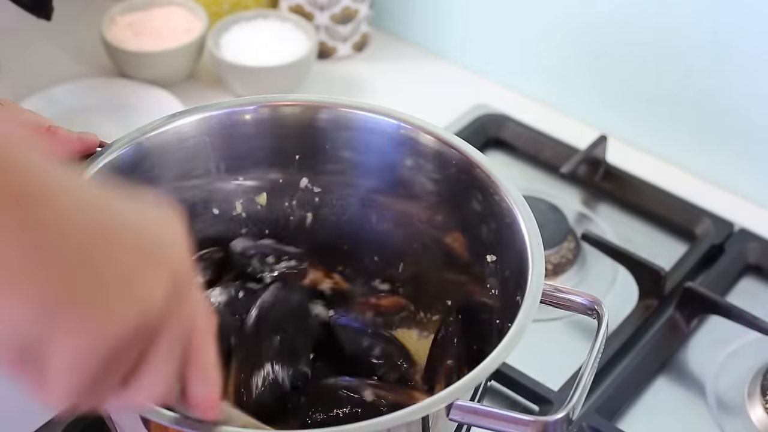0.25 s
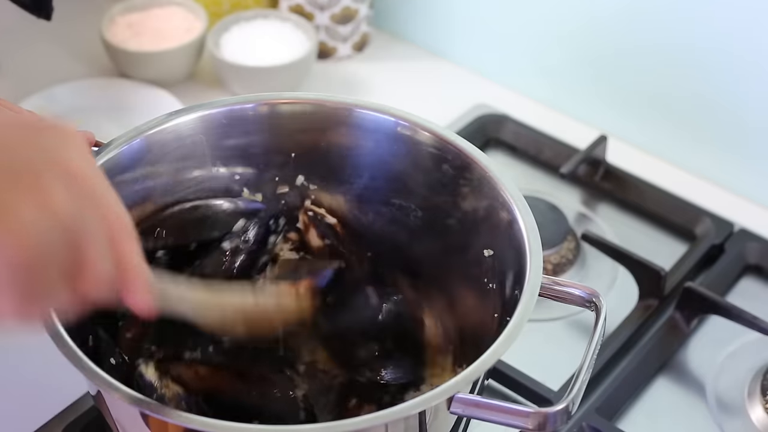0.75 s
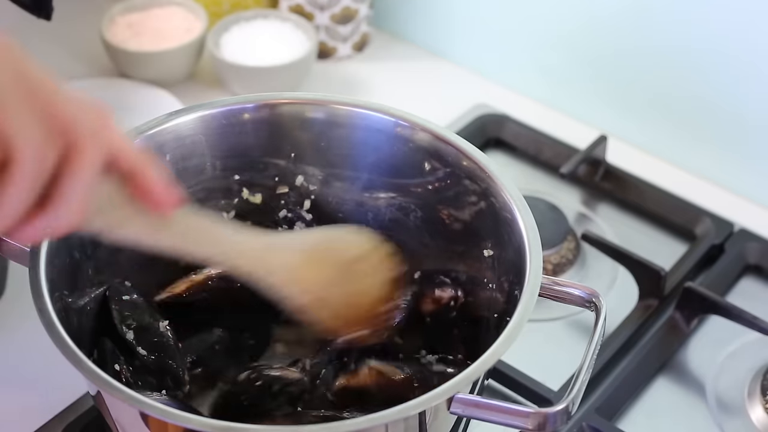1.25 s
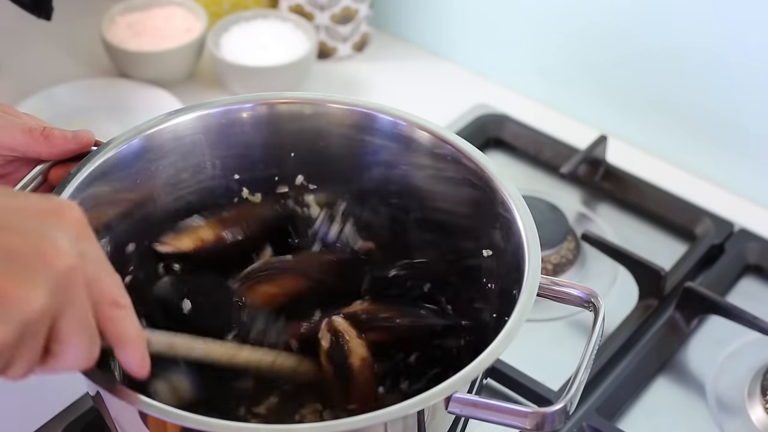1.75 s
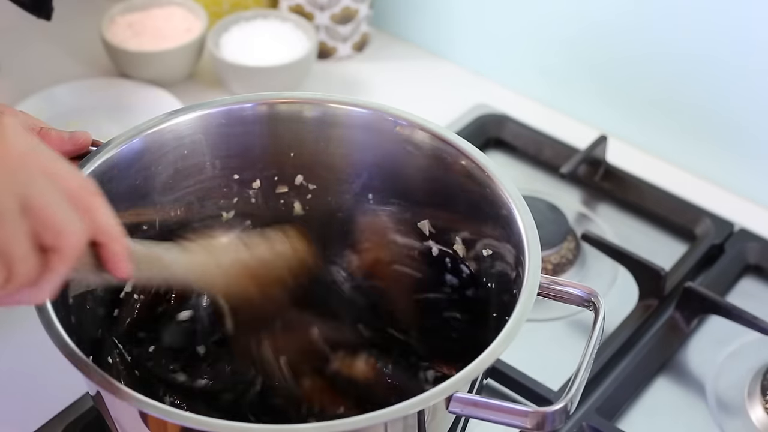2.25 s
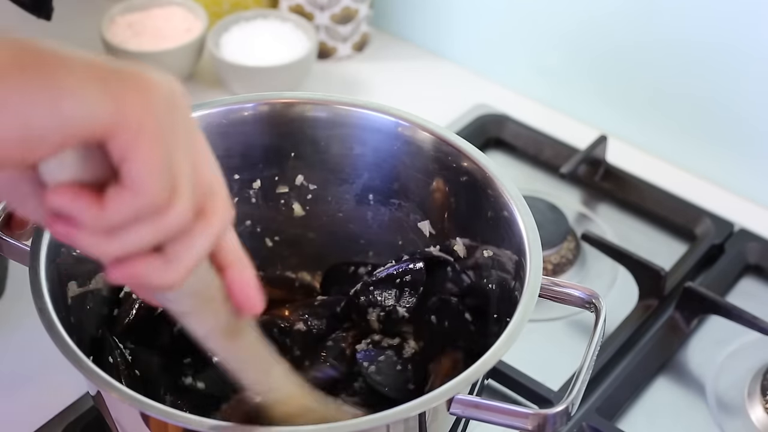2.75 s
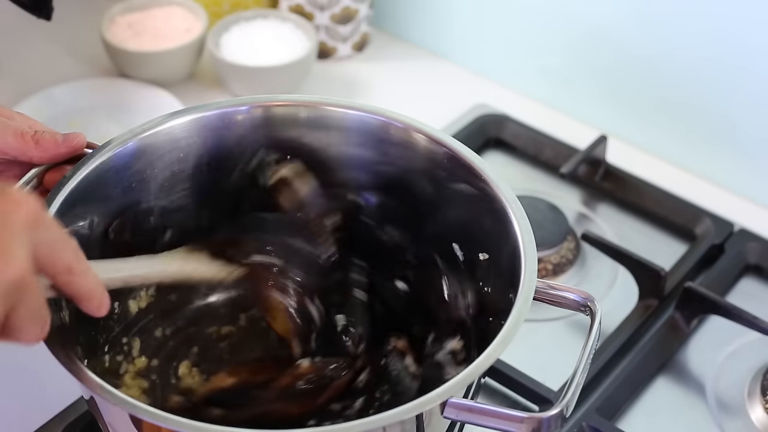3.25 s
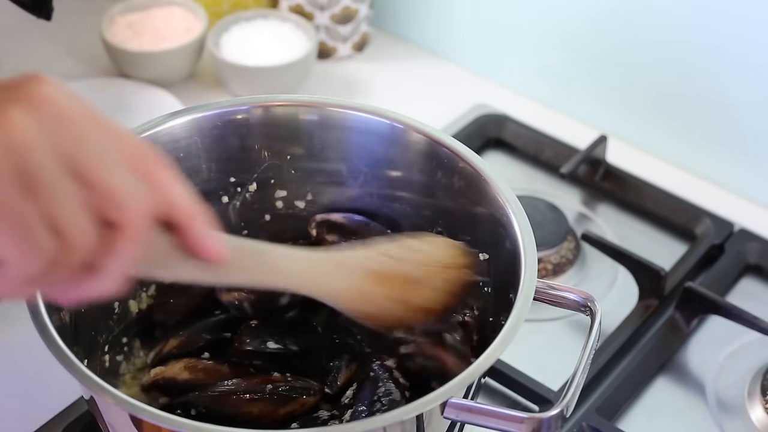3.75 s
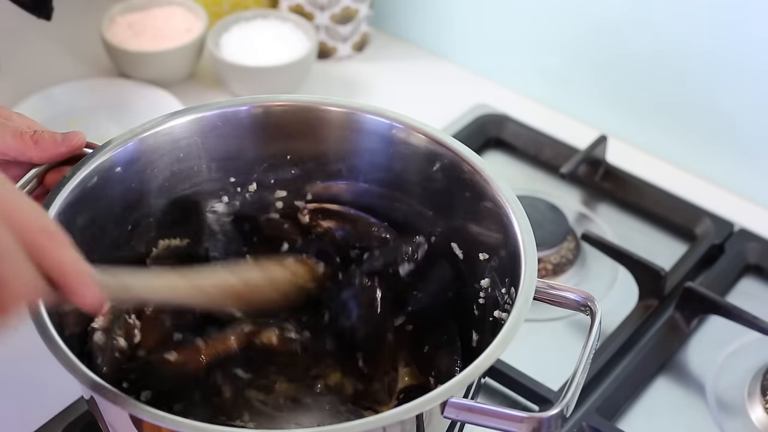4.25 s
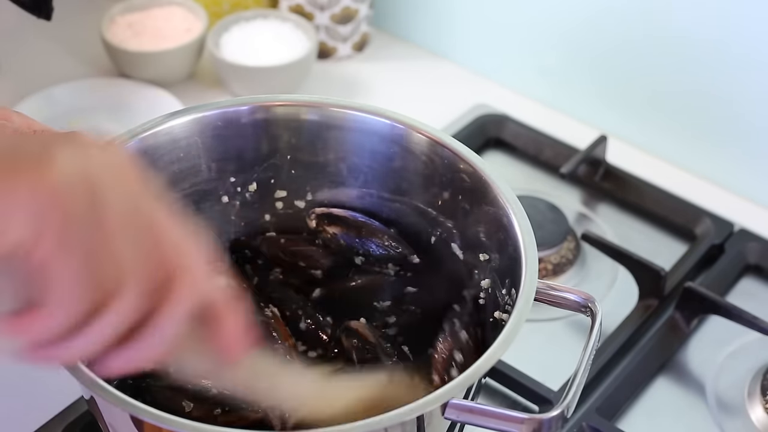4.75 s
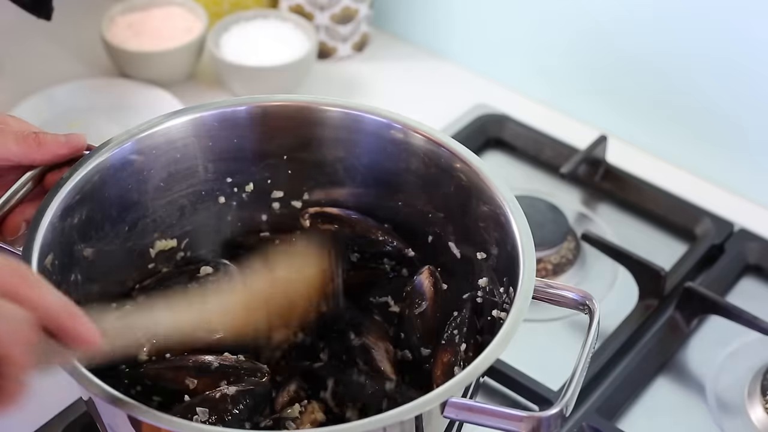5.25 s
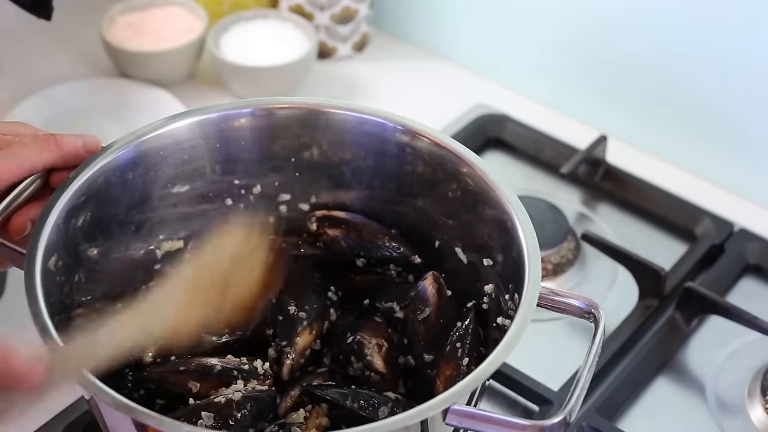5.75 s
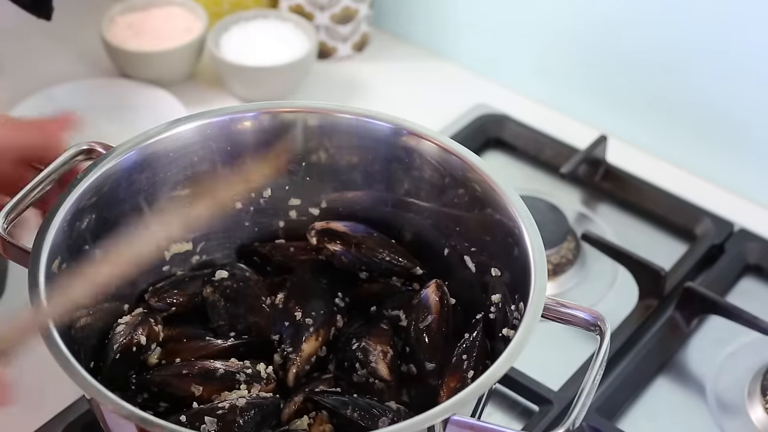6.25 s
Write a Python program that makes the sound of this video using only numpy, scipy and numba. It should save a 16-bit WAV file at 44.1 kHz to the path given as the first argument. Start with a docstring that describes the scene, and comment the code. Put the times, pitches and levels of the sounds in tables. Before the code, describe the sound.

From the start, a wooden spoon stirs mussels in a steel pot, close to the microphone in a small kitchen with short, hard echoes. The hollow shells clack, slide and tumble in irregular surges, with fine gritty crackling between them and the low, uneven scrape of the spoon on the bottom. Hits on the wall give short, damped metallic rings. The sharpest clacks come at about 0.7, 1.5 and 2.4 seconds, and the clatter stays busy until it thins out around 5 seconds. At about 5.4 seconds the wet spoon gives a brief, rough, rising squeak. The shells settle and the spoon knocks on the rim four times, at roughly 5.5, 5.75, 5.95 and 6.15 seconds, each a woody knock with a bright steel shimmer. A fizzing ring fades into faint room tone by about 6.5 seconds.

```python
"""Mussel shells clack and tumble as a wooden spoon stirs them in a steel pot, close to one microphone
in a small hard kitchen. The hollow shells slide and strike each other, grit crackles between them,
and the spoon sticks and slips over the bottom. Blows ring the steel wall, damped by the shells
leaning on it. The wet spoon squeaks out of the heap and is knocked four times on the rim,
which shimmers and leaves a fizzing tail."""
import sys
import numpy as np
from scipy import signal
from scipy.fft import rfft, irfft
from scipy.io import wavfile
from numba import njit

SR = 44100
rng = np.random.default_rng(int(sys.argv[2]) if len(sys.argv) > 2 else 0)


def file_out(sig):
    """Save sig as 16-bit WAV at sys.argv[1]."""
    # one column per channel
    cols = np.atleast_2d(sig).T
    # limit, then scale
    lim = np.clip(cols, -1, 1)
    pcm = np.round(lim * 32767).astype(np.int16)
    wavfile.write(sys.argv[1], SR, pcm)


N = 287091

# shells striking shells or steel: (time [s], shell ring [dB], shell pitch [Hz], favoured pot pitch [Hz],
# hollow knock [dB], treble [dB], pot ring [dB], rattle t60 [s])
CLACKS = [(0.049, -17, 1620, 1605, -46, -21.5, -24, 0.037), (0.095, 1, 2780, 1080, -14, -19.5, -19, 0.042),
          (0.13, -7, 1660, 820, -20, -34, -18, 0.059), (0.186, 2.5, 2570, 602, -9.5, -24, -23, 0.1),
          (0.225, 7, 3170, 3210, -35, -17, -21, 0.055), (0.302, -4, 2550, 2700, -26, -12.5, -29, 0.073),
          (0.344, 7, 2060, 1940, -19, -28.5, -26, 0.033), (0.41, -12, 1830, 1000, -13.5, -23, -45, 0.042),
          (0.454, -20, 1860, 1080, -30, -51, -44, 0.045), (0.474, -2, 1760, 1160, -31, -33, -34, 0.033),
          (0.512, -2, 4000, 1010, -12, -20, -16, 0.16), (0.596, -14, 1680, 1020, -10, -30, -29, 0.069),
          (0.623, -1, 1574, 980, -7, -44, -29, 0.12), (0.639, 4, 3290, 842, -13, -10, -13.5, 0.027),
          (0.728, 14.5, 2394, 850, -18, -14, -28, 0.028), (0.824, 3.5, 2410, 842, -49, -23, -16, 0.047),
          (0.927, 5, 1725, 835, -33, -29, -20.5, 0.032), (0.96, 4.5, 1950, 860, -15, -16.5, -35, 0.037),
          (1.018, 4.5, 3860, 836, -18, -16, -43, 0.088), (1.095, 5, 2000, 1040, -15, -30, -45, 0.05),
          (1.116, 6, 1850, 1860, -12, -23.5, -37, 0.062), (1.191, -20, 1640, 1046, -14, -37, -51, 0.081),
          (1.207, -22, 1650, 827, -10, -27, -21, 0.036), (1.239, -12, 1710, 1112, -10, -35, -32, 0.067),
          (1.377, -27, 1605, 1090, -22, -51, -35.5, 0.05), (1.446, -6, 1660, 822, -12, -57, -23.5, 0.05),
          (1.494, 15.5, 1770, 1260, -20, -25, -24, 0.055), (1.579, 5, 2930, 3060, -23, -15, -25, 0.053),
          (1.604, -4, 2570, 1130, -25, -20, -30, 0.037), (1.683, -12, 4040, 1110, -25, -26, -32, 0.045),
          (1.697, -11, 1630, 1000, -15, -21, -39, 0.034), (1.724, 7, 4100, 880, -6.5, -12, -36, 0.029),
          (1.811, -4, 1600, 1075, -20, -26, -18.5, 0.065), (1.877, -20, 1820, 1100, -28, -45, -43, 0.046),
          (1.924, -17, 1930, 1090, -27, -34, -27, 0.15), (1.957, -7, 1740, 1027, -9, -41, -39, 0.17),
          (2, -16, 1700, 1080, -15, -53, -43, 0.052), (2.031, -9, 1840, 990, -14.5, -20.5, -29, 0.092),
          (2.092, -1, 3886, 3820, -9.5, -17, -35, 0.057), (2.15, 7, 1620, 1070, -6, -21.5, -41, 0.038),
          (2.235, -6.5, 3800, 1460, -26, -27, -35, 0.083), (2.298, -20, 1840, 1000, -20, -48, -32, 0.055),
          (2.336, -14, 1930, 1900, -23, -26, -35, 0.064), (2.356, -17, 1760, 1080, -10, -22.5, -16, 0.11),
          (2.429, -6, 1700, 1000, -16, -22, -40, 0.04), (2.433, 14.5, 3130, 3240, -30, -7, -21, 0.06),
          (2.607, -12, 1800, 1150, -16, -27, -31, 0.055), (2.631, -6, 1550, 1060, -42, -22.5, -42, 0.054),
          (2.68, -12, 4250, 4370, -19, -24, -16, 0.039), (2.773, -23, 2750, 622, -19.5, -32, -19, 0.089),
          (2.854, -6, 1640, 1132, -13.5, -43, -39, 0.065), (2.903, -13, 1920, 1095, -13, -30, -35, 0.064),
          (2.951, -24, 3090, 634, -19, -51, -36, 0.07), (2.979, -21, 2420, 1045, -17.5, -41, -40, 0.13),
          (3.009, 7.5, 2690, 860, -14, -14.5, -28, 0.084), (3.096, 8.5, 4460, 1090, -19, -7.5, -32, 0.028),
          (3.234, -10, 4660, 3080, -22, -25.5, -31, 0.12), (3.252, -13, 2060, 1108, -11.5, -48, -35, 0.11),
          (3.329, -7, 2180, 1010, -29, -38, -25.5, 0.05), (3.363, -10, 3080, 3080, -29, -29.5, -35, 0.099),
          (3.418, -23, 1590, 1110, -31, -41, -34, 0.024), (3.454, -22, 3090, 3050, -26, -9.5, -24.5, 0.038),
          (3.489, 2, 1740, 1654, -43, -17, -13, 0.084), (3.6, -9, 1715, 1660, -24, -34, -41, 0.05),
          (3.635, 3, 3940, 3630, -18, -14.5, -29, 0.082), (3.751, -8, 1810, 1800, -33, -41, -21, 0.13),
          (3.813, -3, 1750, 1790, -36, -23.5, -32, 0.065), (3.872, -2, 4100, 4000, -13.5, -12, -13.5, 0.08),
          (3.99, -14, 1600, 1060, -44, -38, -22, 0.036), (4.023, -7, 1755, 1820, -44, -39, -18, 0.1),
          (4.053, -8, 1610, 1080, -28, -44, -28, 0.046), (4.087, 2, 2110, 2130, -18, -24, -25, 0.058),
          (4.168, -13, 1820, 1107, -16.5, -38, -32, 0.18), (4.211, 4, 1790, 1115, -23, -25, -23, 0.027),
          (4.235, -1, 2580, 2640, -37, -17, -33, 0.055), (4.244, -3, 1720, 1083, -14.5, -28, -12.5, 0.2),
          (4.309, 2, 1620, 1710, -23, -18, -19, 0.043), (4.328, 2, 1650, 1684, -36, -11, -15.5, 0.035),
          (4.417, -5, 1630, 1650, -26, -33, -42, 0.063), (4.432, -7, 1740, 1770, -24, -20, -18, 0.067),
          (4.482, -21, 1670, 995, -29, -25, -43, 0.061), (4.517, 5, 4670, 1010, -14.5, -11.5, -25, 0.042),
          (4.559, -6, 1650, 1060, -18, -19.5, -27, 0.026), (4.625, -1.5, 1720, 1716, -12, -11, -9, 0.055),
          (4.79, -5, 1850, 1150, -15, -52, -37, 0.042), (4.85, -17, 1710, 1700, -36, -40, -29, 0.032),
          (4.887, -4, 1760, 1760, -16.5, -28, -29, 0.13), (4.944, -13, 3280, 830, -38, -30, -32, 0.037),
          (4.976, -20, 1750, 1100, -17, -34, -41, 0.059), (5.038, -9, 1530, 1064, -17, -46, -38, 0.087),
          (5.11, -16, 1780, 1810, -40, -33, -40, 0.082), (5.132, -12, 2200, 1100, -22, -24, -45, 0.03),
          (5.137, 7, 2590, 1150, -6, -20.5, -36, 0.035), (5.216, -5, 1500, 1210, -10, -53, -27, 0.033),
          (5.238, -5, 3160, 1036, -11, -20, -40, 0.08), (5.315, -22, 3430, 590, -32, -32, -35, 0.062),
          (5.398, -27, 1680, 732, -20, -48, -39, 0.048), (5.41, -25, 1680, 915, -23, -49, -36, 0.078),
          (5.535, -15, 1765, 567, -15.5, -32, -26, 0.061), (5.541, 4, 1720, 1700, -33, -8, -34, 0.054),
          (5.75, 7, 1550, 1170, -9.5, -21, -26, 0.038), (5.755, 5, 5300, 1710, -13, -11, -42, 0.062),
          (5.946, 5, 3100, 2960, -10, -14, -39, 0.12), (6.166, -1, 1686, 1680, -15, -14, -22, 0.13)]
# spoon on the rim: (time [s], wood [dB], pot ring [dB], high shimmer [dB])
RIM_KNOCKS = [(5.533, -0.5, -26, -35), (5.747, -4, -31, -40), (5.946, -5, -29, -32.5),
              (6.159, -7.5, -28.5, -33.5)]


def undb(db):
    """Gain of a level."""
    return 10 ** (np.asarray(db) / 20)


def unit(x):
    """Scaled to rms 1."""
    return x / np.sqrt(np.mean(x ** 2))


def band(x, lo_hz, hi_hz):
    """Causal band-pass."""
    return signal.sosfilt(signal.butter(2, [lo_hz, hi_hz], "bandpass", fs=SR, output="sos"), x)


def ring(x, hz, t60):
    """One mode struck by x."""
    pole = np.exp((2j * np.pi * hz - np.log(1000) / t60) / SR)
    return signal.lfilter([0, pole.imag], [1, -2 * pole.real, abs(pole) ** 2], x)


def blows(times, gain):
    """Impulses at the given times in seconds."""
    x = np.zeros(N)
    np.add.at(x, np.clip((times * SR).astype(int), 0, N - 1), gain)
    return x


def ticks(per_s, spread_db):
    """Random impulses of uneven size."""
    impulses = (rng.random(N) < per_s / SR) * rng.standard_normal(N)
    return impulses * undb(spread_db * np.minimum(rng.exponential(size=N), 4.5))


def body(x, resonances):
    """x through broad resonances (centre [Hz], width [Hz], level [dB]); rms 1."""
    return unit(sum(undb(db) * unit(band(x, hz - w / 2, hz + w / 2)) for hz, w, db in resonances))


def fading(t60, seconds):
    """Exponential fall, 60 dB in t60 seconds."""
    return np.exp(-np.log(1000) * np.arange(int(seconds * SR)) / SR / t60)


def add(out, start_s, x):
    """Mix x in at the given time."""
    i = int(start_s * SR)
    out[i:i + len(x)] += x[:N - i]


def room_tone(level_db=-41.5):
    """The still kitchen around the microphone: steady shaped noise."""
    # spectrum of the room: (frequency [Hz], relative density [dB])
    spectrum = [(30, -17), (80, 5.5), (120, 0), (250, -5.5), (500, -2), (1500, 3), (4000, -11.5),
                (8000, -4), (16000, -42)]
    hz, db = np.transpose(spectrum)
    bins_hz = np.maximum(np.fft.rfftfreq(N, 1 / SR), 1)
    shape = undb(np.interp(np.log(bins_hz), np.log(hz), db))
    return undb(level_db) * unit(irfft(rfft(rng.standard_normal(N)) * shape, N))


def kitchen_tail(direct, wet_db=-4):
    """Kitchen echoes and crowded steel modes merge into a tail whose bands fade at their own pace."""
    # bands of the tail: (frequency [Hz], relative density [dB], t60 [s])
    bands = [(183, -14, 0.55), (465, -6.5, 0.68), (1070, -3, 0.13), (2650, 3, 0.41), (4850, -1.5, 0.41),
             (8240, 6.5, 0.29), (10500, 1.5, 0.18), (11900, 11.5, 0.13), (16400, -25, .3)]
    centres = np.transpose(bands)[0]
    edges = np.sqrt(np.append(100, centres) * np.append(centres, 20000))
    tail = sum(undb(db) * band(rng.standard_normal(int(.7 * SR)), lo, hi) * fading(t60, .7)
               for lo, hi, (_, db, t60) in zip(edges, edges[1:], bands))
    return undb(wet_db) * signal.fftconvolve(direct, tail / np.sqrt(np.sum(tail ** 2)))[:N]


def fine_crackle(level_db):
    """Dense tiny high ticks: grit while stirring, then the fizzing tail of the rim knocks."""
    fine = ticks(per_s=6500, spread_db=3.6)
    return (unit(band(fine, 2550, 9700)) + undb(-18) * unit(band(fine, 10200, 13400))) * undb(level_db)


def spoon_squeak(roughness=0.66):
    """The wet spoon squeaks as it leaves the heap: a rough rising tone."""
    # course of the squeak: (time [s], pitch [Hz], level [dB])
    glide = [(5.36, 606, -58), (5.375, 622, -28), (5.399, 747, -42), (5.42, 885, -30), (5.45, 950, -42),
             (5.469, 1010, -60)]
    times, hz, db = np.transpose(glide)
    t = np.arange(N) / SR
    tone = np.sin(2 * np.pi * np.cumsum(np.interp(t, times, hz)) / SR)
    flutter = 1 + roughness * unit(band(rng.standard_normal(N), 18, 200))
    return tone * flutter * undb(np.interp(t, times, db, left=-100, right=-100))


def spoon_strokes(attack_s=0.0084, release_s=0.011):
    """Gain of the dragging spoon: each scrape sets in, drifts in level and stops."""
    # scrapes over the bottom: (start [s], end [s], first level [dB], last level [dB])
    strokes = [(0.0, 0.056, -26.5, -42), (0.13, 0.42, -28, -42), (0.448, 0.64, -43.5, -31.5),
               (0.715, 0.98, -41, -55), (1.019, 1.382, -36, -44.5), (1.45, 1.62, -27, -41),
               (1.629, 1.901, -32.5, -37), (1.932, 2.12, -35, -47), (2.145, 2.32, -35, -44),
               (2.345, 2.44, -34, -34.5), (2.6, 2.72, -48, -34.5), (2.768, 2.864, -35.5, -44),
               (2.875, 3.087, -40.5, -26), (3.235, 3.426, -42, -48), (3.45, 3.55, -43, -39),
               (3.75, 3.84, -44, -47), (3.882, 4.33, -40, -45.5), (4.41, 4.62, -48, -46),
               (4.78, 4.903, -45, -36), (4.895, 5.1, -25.5, -53), (5.126, 5.2, -46, -54),
               (5.21, 5.25, -40, -34), (5.25, 5.48, -28, -47)]
    t = np.arange(N) / SR
    gain = np.zeros(N)
    for start, end, first_db, last_db in strokes:
        attack = np.clip((t - start) / attack_s + (start == 0), 0, 1)
        release = np.exp(-np.maximum(t - end, 0) / release_s)
        gain = np.maximum(gain, attack * release * undb(np.interp(t, [start, end], [first_db, last_db])))
    return gain


def spoon_drag(scraping):
    """The spoon sticks and slips over the bottom: dense uneven jolts into steel and grate."""
    # resonances of the pot bottom and the grate under it: (centre [Hz], width [Hz], level [dB])
    bottom = [(50, 53, -7.5), (116, 41, 2.5), (219, 49, -6), (353.6, 82, 3.5), (491, 93, 5.5),
              (602, 67, -29.5)]
    return body(ticks(per_s=900, spread_db=2.8), bottom) * scraping


def spoon_knocks(scatter_db=5.0):
    """The rim gives a soft push to the wooden spoon's short modes, a little different each time."""
    # modes of the spoon: (frequency [Hz], level [dB], t60 [s])
    modes = [(130, -10, 0.027), (263, 5.5, 0.018), (504.7, 5.5, 0.053), (700, 5, 0.025), (1156, 4, 0.029),
             (1420, 0.5, 0.033), (1720, 2.5, 0.036)]
    times, knock_db, *_ = np.transpose(RIM_KNOCKS)
    scatter = scatter_db * rng.uniform(-1, 1, (len(RIM_KNOCKS), len(modes)))
    soft_contact = np.hanning(14) / 7
    out = np.zeros(N)
    for k, (hz, mode_db, t60) in enumerate(modes):
        hits = blows(times, undb(knock_db + mode_db - 6 + scatter[:, k]))
        out += (-1) ** k * ring(np.convolve(hits, soft_contact)[:N], hz, t60)
    return out


def rim_shimmer(count, lo_hz, hi_hz, mean_t60, tilt_db_per_oct=-4.0, rise_s=0.0064):
    """A knock on the rim wakes a crowd of high steel modes that take a moment to build up."""
    out, t = np.zeros(N), np.arange(int(.6 * SR)) / SR
    place, life = rng.random((count, 2)).T
    hz = lo_hz + (hi_hz - lo_hz) * place ** 0.74
    modes = np.sin(2 * np.pi * hz[:, None] * t) * fading(mean_t60 * (.5 + life[:, None]), .6)
    tilt = undb(tilt_db_per_oct * np.log2(hz / lo_hz))
    rise = np.clip(t / rise_s, 0, 1) ** 3
    for start, _, _, db in RIM_KNOCKS:
        weights = rng.standard_normal(count) * tilt
        add(out, start, undb(db) * rise * (weights @ modes))
    return out


@njit
def wall_mode(hits, rubbing, turn, loss):
    """One steel mode: each blow adds energy to the swing already there; loss is given per sample."""
    out, swing = np.empty(len(hits)), 1e-9 + 0j
    for i in range(len(hits)):
        swing = swing * turn * (1 - loss[i]) + rubbing[i]
        if hits[i] > 0:
            swing *= np.sqrt(1 + (hits[i] / abs(swing)) ** 2)
        out[i] = swing.imag
    return out


def pot_ring(rubbing, freedom, focus_oct=0.033, second_db=-4, spill_db=-18, scatter_db=6.5):
    """Where a blow lands on the steel decides which modes it favours; the rest ring weakly and unevenly."""
    # clear modes of the pot: (frequency [Hz])
    modes_hz = [486, 592, 681, 844, 883, 1013, 1067, 1095, 1205, 1389, 1657, 1696, 1793, 2032, 2466, 2625,
                2923, 3090, 3263, 3870, 4365, 4790, 5395, 6148, 6870, 7275, 7960, 8390, 9030]
    # response of each mode: (struck inside [dB], knocked on the rim [dB], t60 of the free wall [s])
    responses = [(-8, -13, 0.22), (-3, -4, 0.72), (2.5, 11.5, 0.157), (1, -36, 1.2), (-36, -24, .4),
                 (-11, -8, 1.24), (-12.5, 4, 1.08), (1, 0, 0.35), (9, -21, 0.2), (-48, -35, 0.62),
                 (0.5, -0.5, 0.56), (-10, -0.5, 1.01), (-21, -25, 0.47), (-43, -16, 0.91),
                 (-21, -2.5, 0.53), (6, -28, 0.39), (-8, -28, 0.55), (8, -14, 0.13), (-4.5, -10, 0.16),
                 (10.5, -14, 0.18), (-10, -7, 0.27), (2, 3.5, 0.36), (-11, 1, 0.58), (-39, -7, 1),
                 (-21, 4, 0.53), (-12, -1.5, 0.92), (-24, 7, 0.52), (-24, -20, 0.36), (0, -15, 0.15)]
    # spoon or shells bumping the bare wall: (time [s], favoured pitch [Hz], second pitch [Hz], ring [dB])
    bumps = [(0.13, 844, 844, -29.5), (1.725, 844, 844, -26.5), (2.45, 3870, 3263, -31),
             (3.03, 3870, 3870, -33), (3.456, 1657, 1657, -21.5), (3.52, 4365, 4365, -15),
             (3.871, 4365, 2625, -24), (4.329, 1657, 3090, -16), (4.615, 844, 2625, -20),
             (4.929, 844, 844, -28)]
    shell_hits = [(start, pot_hz, shell_hz, db) for start, _, shell_hz, pot_hz, _, _, db, _ in CLACKS]
    times, favoured_hz, second_hz, ring_db = np.vstack([shell_hits, bumps]).T
    knock_times, _, knock_db, _ = np.transpose(RIM_KNOCKS)
    spills = undb(spill_db + scatter_db * rng.uniform(-1.7, 1, (len(times), len(modes_hz))))
    out = np.zeros(N)
    for hz, (inside_db, rim_db, t60), spill in zip(modes_hz, responses, spills.T):
        first, second = (np.exp(-(np.log2(hz / f) / focus_oct) ** 2) for f in (favoured_hz, second_hz))
        share = first + undb(second_db) * second + spill
        hits = blows(times, undb(inside_db + ring_db) * share)
        hits += blows(knock_times, undb(knock_db + rim_db))
        loss = np.log(1000) / (t60 * np.clip(freedom, .1, 3) * SR)  # leaning shells damp the wall
        out += wall_mode(hits, undb(inside_db) * rubbing + 1e-18, np.exp(2j * np.pi * hz / SR), loss)
    return out


def shell(hz, mean_t60, chance):
    """A hollow shell: a main pitch and uneven overtones that die fast, varied by 0..1 draws; peak 1."""
    t = np.arange(int(.05 * SR)) / SR
    partials_hz = np.minimum(hz * np.append(1, .7 * 2.6 ** chance[1:]), .4 * SR)
    weights = np.append(1, .5 * chance[1:][::-1])
    x = weights @ np.sin(2 * np.pi * partials_hz[:, None] * t) * fading(mean_t60 * (.5 + chance[0]), .05)
    return x / np.abs(x).max()


def heap_motion(slide_db, scraping, push_db=5, shake_db=-13.5, shake_t60=0.16):
    """Gain of the moving shells: they slide, the spoon pushes them, each clack shakes neighbours loose."""
    times, _, _, _, knock_db, treble_db, *_ = np.transpose(CLACKS)
    jolt_power = blows(times, undb(knock_db) ** 2 + undb(treble_db) ** 2)
    power_decay = np.exp(-2 * np.log(1000) / shake_t60 / SR)
    shake_power = undb(shake_db) ** 2 * signal.lfilter([1], [1, -power_decay], jolt_power)
    return np.sqrt(undb(slide_db) ** 2 + (undb(push_db) * scraping) ** 2 + shake_power)


def shell_tumble(motion, taps_per_s=300, tap_spread_db=3.5, tap_db=-3):
    """Ribbed shells slide over each other in dense slips, and tap at random spots."""
    # resonances of the heap and the air in the pot: (centre [Hz], width [Hz], level [dB])
    heap = [(482, 76, -2.5), (664, 110, -4.5), (1102, 186, 5.5), (1260, 190, -2.5), (1691, 142, 0),
            (2090, 370, -4.5), (2587, 383, -2), (3154, 600, -3), (4210, 1430, -4.5)]
    spots = [shell(900 * 5.5 ** (draw[0] ** 1.356), 0.014, draw[1:]) for draw in rng.random((250, 8))]
    taps = np.zeros(N)
    for when, force, where in rng.random((int(N / SR * taps_per_s), 3)):
        db = -tap_spread_db * np.log(1 - force)
        add(taps, when * (N - 1) / SR, undb(db) * spots[int(where * len(spots))])
    slide = body(ticks(per_s=1800, spread_db=4.0), heap)
    return (slide + undb(tap_db) * unit(taps)) * motion


def shell_clacks(rattle_s=.12):
    """A struck shell rings, and rattles with a hollow knock and a gritty crack; returns the two apart."""
    rings, rattles = np.zeros(N), np.zeros(N)
    chances = rng.random((len(CLACKS), 7))
    noise = rng.standard_normal((len(CLACKS), int(rattle_s * SR)))
    bands_hz = (600, 2000), (1500, 5140), (3300, 9120), (10000, 13000)
    layers = (unit(band(noise, lo, hi)) for lo, hi in bands_hz)
    for clack, chance, low, mid, high, top in zip(CLACKS, chances, *layers):
        start, shell_db, shell_hz, pot_hz, knock_db, treble_db, _, t60 = clack
        add(rings, start, undb(shell_db - 8) * shell(shell_hz, 0.64 * t60, chance))
        hollow = 0.35 * low + 1.4 * unit(ring(low, np.clip(pot_hz, 600, 1300), t60=0.13))
        crack = undb((knock_db + treble_db) / 2 + 0.5) * mid + undb(treble_db + 3) * high
        add(rattles, start, (undb(knock_db - 3.5) * hollow + crack) * fading(t60, rattle_s))
        add(rattles, start, undb(treble_db - 15.5) * top * fading(1.5 * t60, rattle_s))
    return rings, rattles


def scene():
    """Shells, spoon and pot close to the microphone, with the kitchen behind them; mono."""
    # state of the pot: (time [s], shells sliding [dB], fine high crackle [dB], wall's freedom [x t60])
    # the crackle is grit while stirring, then the fizzing tail of the rim knocks
    pot_state = [(0.0, -40, -36, 0.34), (0.31, -27.5, -35, 1), (0.67, -30.5, -37, 1),
                 (1.1, -25, -38.5, 0.93), (1.36, -44.5, -41, 0.3), (1.52, -28.5, -38.5, 0.97),
                 (1.72, -21, -32.5, 0.54), (1.91, -35, -38, 0.8), (2.0, -27, -44.5, 1),
                 (2.32, -36, -38, 0.8), (2.39, -20, -33, 0.94), (2.49, -36, -34, 1), (2.75, -38, -42, 0.25),
                 (2.96, -33, -42, 0.6), (3.05, -22, -37, 0.58), (3.12, -35, -37, 0.4),
                 (3.3, -34, -37.5, 0.55), (3.52, -26, -39, 0.56), (3.8, -36.5, -48, 0.65),
                 (4.25, -29.5, -44, 0.55), (4.53, -32, -36, 0.47), (4.74, -38, -44, 0.36),
                 (4.93, -37.5, -42, 0.4), (5.12, -40.5, -52, 0.24), (5.28, -46, -52, 0.5),
                 (5.5, -64, -46.5, 0.51), (5.71, -70, -42, 0.9), (6.15, -70, -48, 0.9),
                 (6.51, -66, -56, 0.45)]
    times, *columns = np.transpose(pot_state)
    slide_db, crackle_db, freedom = (np.interp(np.arange(N) / SR, times, column) for column in columns)
    scraping = spoon_strokes()
    rings, rattles = shell_clacks()
    loose_shells = rattles + shell_tumble(heap_motion(slide_db, scraping))
    spoon = spoon_knocks() + spoon_drag(scraping) + spoon_squeak()
    crackle = fine_crackle(crackle_db)
    steel = pot_ring(undb(-57) * loose_shells, freedom)
    steel += rim_shimmer(count=200, lo_hz=2500, hi_hz=9400, mean_t60=0.4)
    steel += undb(-15) * rim_shimmer(count=40, lo_hz=9500, hi_hz=14500, mean_t60=0.22)
    tail = kitchen_tail(undb(-5.5) * rings + band(loose_shells, 370, 9000) + undb(-3) * spoon + crackle)
    # shells radiate little bass; the steel rings are kept free of low thuds too
    near = band(rings + loose_shells + steel, 374, 21000) + spoon + crackle
    return (near + tail + room_tone())[None]


def record(dry, top_hz=16000):
    """The microphone chain rounds the loudest peaks and cuts the top."""
    rounded = 1.05 * np.tanh(dry / 1.38)
    return signal.sosfilt(signal.ellip(10, .2, 70, top_hz, fs=SR, output="sos"), rounded)


dry = scene()
out = record(dry)
file_out(out)
```